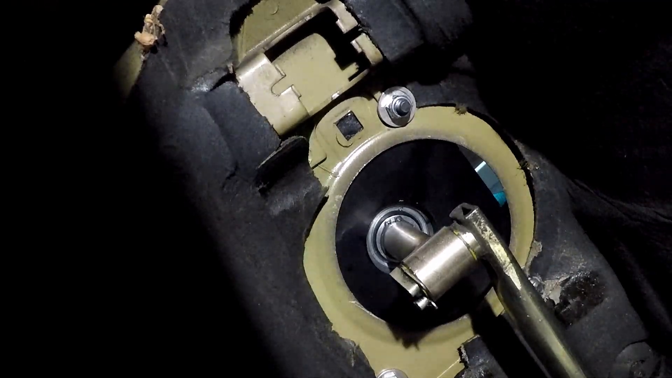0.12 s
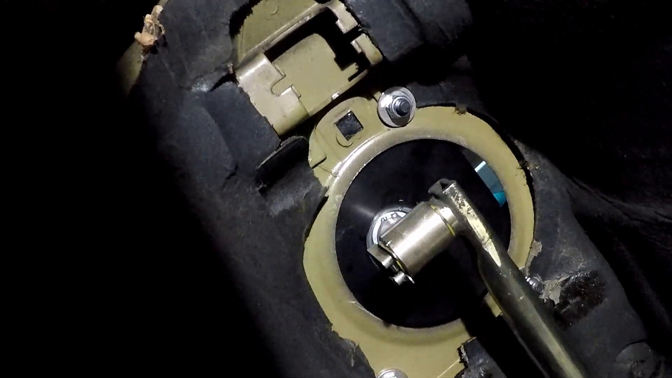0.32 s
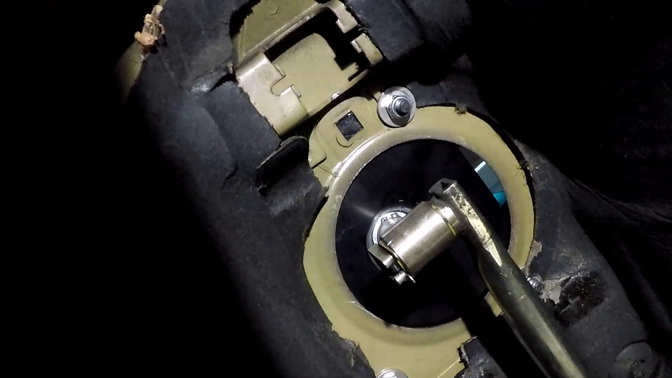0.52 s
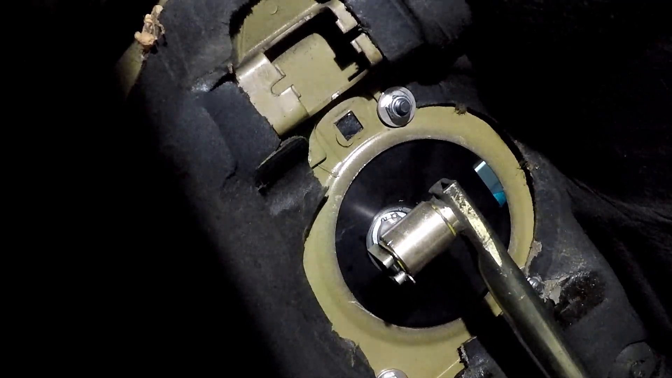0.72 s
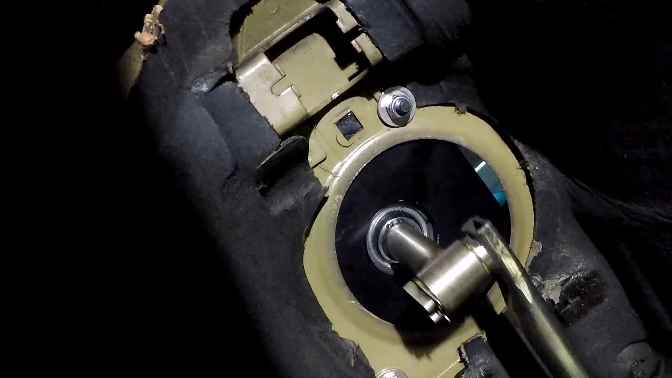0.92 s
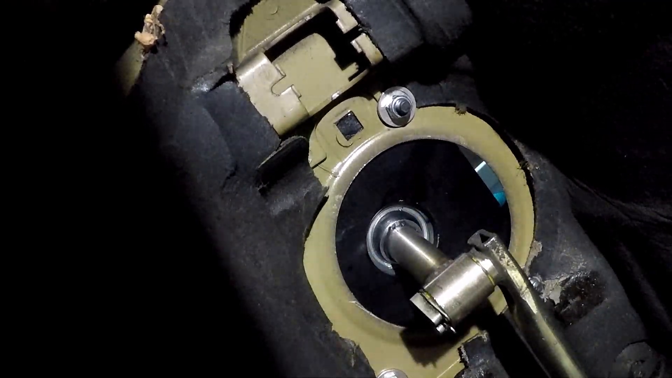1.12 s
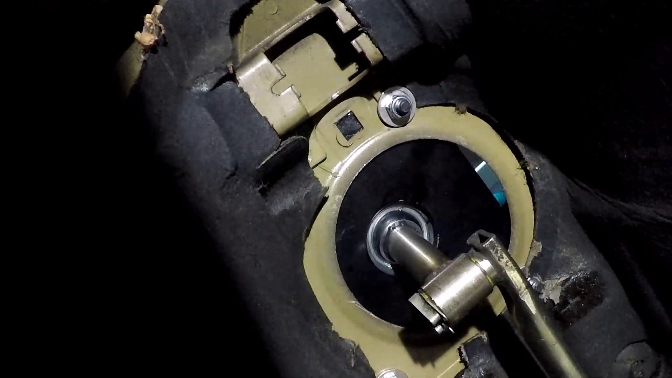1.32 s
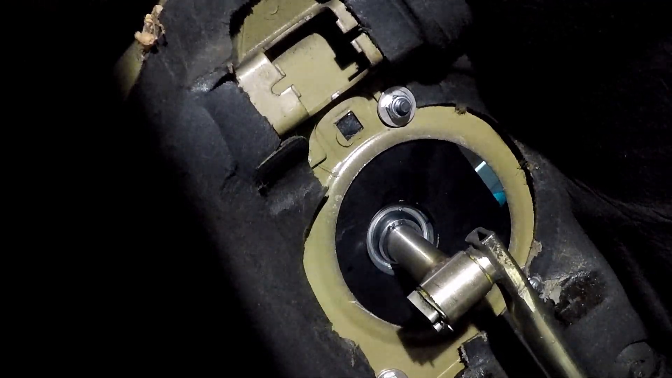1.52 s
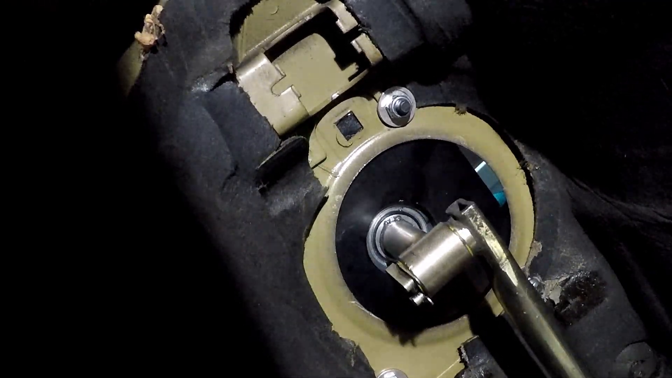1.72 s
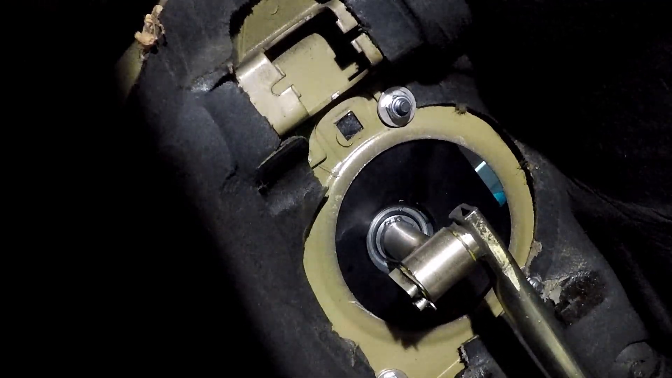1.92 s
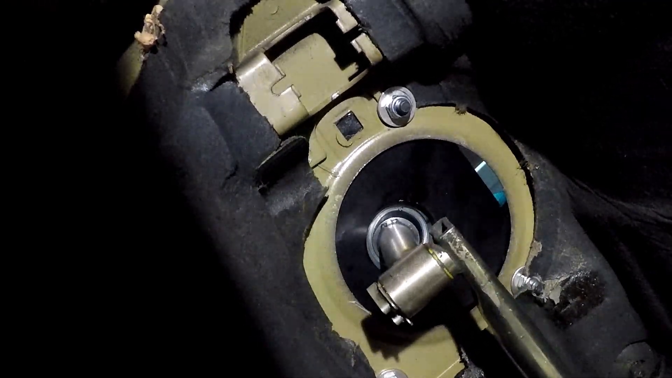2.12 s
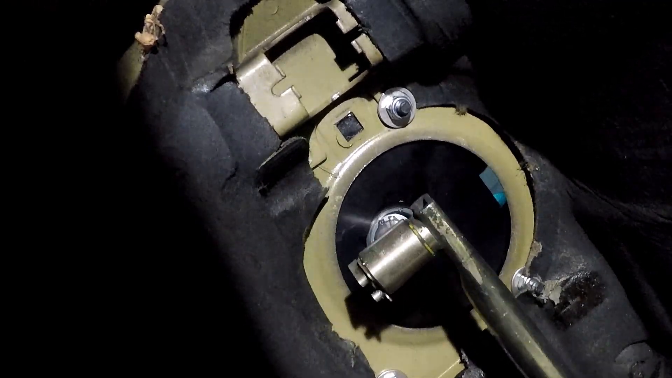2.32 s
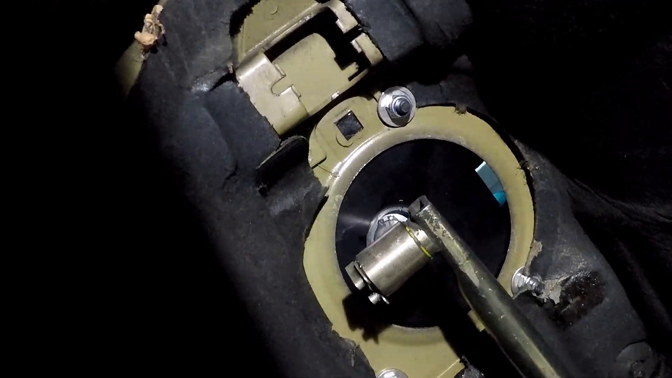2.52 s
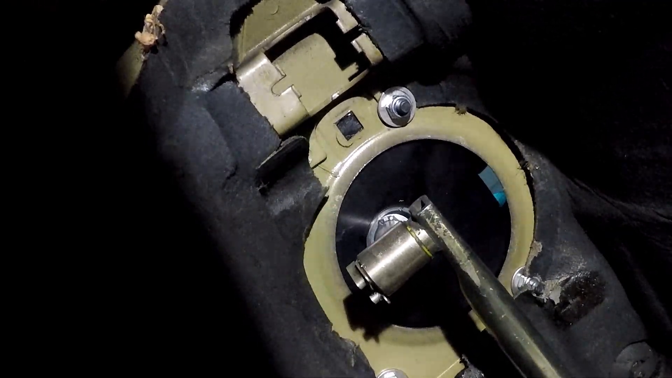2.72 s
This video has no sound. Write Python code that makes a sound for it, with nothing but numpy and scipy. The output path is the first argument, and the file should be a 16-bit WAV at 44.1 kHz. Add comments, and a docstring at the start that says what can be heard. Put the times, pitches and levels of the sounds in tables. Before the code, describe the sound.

Gear linkage clunks heard from beneath a car: a rattling burst of metal knocks, a pause, another cluster, then lighter clicks and a final hard clack, with floor pan boom, close microphone in a quiet garage.

```python
"""Gear lever heard from below

A gear lever is worked through its gate; a small microphone listens under the car in a garage.
Each linkage contact is a chatter of tiny impacts, convolved with the modes of housing and rod; mounts thud.
Shoves excite slowly decaying floor pan modes. Coloured noise makes the sliding rod, sizzling thin metal
and low room hum. The garage returns a diffuse echo of the contacts, and a limiter holds the peaks."""
import sys
import numpy as np
from scipy import signal
from scipy.fft import rfft, irfft
from scipy.io import wavfile
from scipy.ndimage import uniform_filter1d, minimum_filter1d

SR = 44100
rng = np.random.default_rng(int(sys.argv[2]) if len(sys.argv) > 2 else 0)


def store_pcm(level_fs):
    """Save levels as 16-bit WAV."""
    pcm = np.round(np.clip(level_fs, -1, 1) * 32767).astype(np.int16)
    wavfile.write(sys.argv[1], SR, np.atleast_2d(pcm).T)


def convert_level_to_amplitude(level_db):
    """Map a level in decibels to its linear amplitude factor."""
    exponent = np.asarray(level_db, float) / 20
    return 10 ** exponent


N = 125685  # samples


def unit(x):
    """Normalisation by mean power: scales to rms 1."""
    return x / np.sqrt(np.mean(x ** 2))


def noise(points, size):
    """Spectral shaping: white noise filtered to (Hz, dB) points on a log frequency axis, rms 1."""
    hz, db = np.array(points, float).T
    f = np.maximum(np.arange(size // 2 + 1) * SR / size, 1)
    gain_db = np.interp(np.log(f), np.log(hz), db, left=-90, right=-90)
    return unit(irfft(rfft(rng.standard_normal(size)) * convert_level_to_amplitude(gain_db), size))


def fade(t, t60):
    """Exponential damping: the amplitude falls by 60 dB in t60 seconds."""
    return np.exp(-np.log(1000) * t / t60)


def swell(t, time_constant):
    """Exponential approach: the amplitude rises from 0 towards 1."""
    return 1 - np.exp(-t / time_constant)


def ring(modes, t, detune, count=1):
    """Modal superposition: each mode is a cluster of damped partials; nominal rms 1 at the start."""
    hz, db, t60 = np.repeat(np.array(modes, float), count, axis=0).T[:, :, None]
    strength, shift, turn = rng.standard_normal((len(hz), 3)).T[:, :, None]
    gain = convert_level_to_amplitude(db + 3 * strength)  # scatter of 3 dB
    phase = 2 * np.pi * hz * (1 + detune * shift) * t
    # the subtracted term starts every partial from zero
    wave = np.sin(phase + 2 * turn) - np.sin(2 * turn) * np.exp(-phase)
    total = (gain * fade(t, t60) * wave).sum(0)
    return total / np.sqrt((gain ** 2).sum() / 2)


def flicker(rate, depth_db):
    """Random amplitude modulation: a gain with rate new values a second and an rms depth in dB."""
    k = int(SR / rate)
    steps = np.repeat(rng.standard_normal(N // k + 1), k)
    return convert_level_to_amplitude(depth_db * unit(uniform_filter1d(steps, k)[:N]))


def curve(table, col):
    """Amplitude envelope: straight lines between the dB values of one column."""
    table = np.array(table)
    return convert_level_to_amplitude(np.interp(np.arange(N) / SR, table[:, 0], table[:, col]))


# Steady room noise. Each row: frequency in Hz, relative density in dB per Hz.
ROOM_COLOUR = [(16, -43), (28, -1), (37, 7), (72, 12), (92, -2.5), (133, 4.5), (156, -9), (187, 6.5),
               (231, -28), (301, -22.5), (353, -29.5), (392, -21), (539, -30.5), (739, -52), (1320, -28.5),
               (1590, -35), (3160, -51), (7550, -46.5), (15400, -62.5)]
# Wavering hum. Each row: centre in Hz, level in dB, offset in Hz at which the band is about 15 dB down.
HUM_BANDS = [(68.8, -78, 3.3), (136.2, -57, 24), (176.8, -61, 3.1), (373.4, -75, 30)]


def room():
    """Stationary background: broadband noise with a slow wander, plus narrowband noise heard as hum."""
    hum = 0
    for hz, db, w in HUM_BANDS:
        hum = hum + convert_level_to_amplitude(db) * noise([(hz - 2 * w, -30), (hz, 0), (hz + 2 * w, -30)], N)
    wander = flicker(4, 1.2)
    return convert_level_to_amplitude(-47) * noise(ROOM_COLOUR, N) * wander + hum


# Rod sliding in its bushes. Each row: time in seconds, scrape level in dB, hiss level in dB.
SLIDE_LEVELS = [(0, -58, -74.5), (.19, -63.5, -77), (.3, -60, -62), (.5, -64, -85), (.75, -67.5, -82),
                (.8, -69.5, -76), (.87, -46.5, -69), (.93, -40, -66), (1.0, -61, -64), (1.1, -67.5, -81),
                (1.3, -66, -80), (1.4, -55.5, -74), (1.55, -58, -78.5), (1.64, -52.5, -68),
                (1.72, -56, -66), (1.9, -60, -77), (2.03, -53, -72), (2.13, -42, -67), (2.21, -63.5, -62.5),
                (2.27, -54, -69.5), (2.4, -53, -73), (2.52, -71, -85.5), (2.75, -68.5, -83),
                (2.85, -61.5, -83)]
# Colour of the scrape. Each row: frequency in Hz, relative density in dB per Hz.
SCRAPE_COLOUR = [(250, -2), (500, 5.5), (1000, -6), (2000, -12), (2800, -16), (4000, -70)]
# Colour of the hiss. Each row: frequency in Hz, relative density in dB per Hz.
HISS_COLOUR = [(2000, -15), (3200, 9), (4500, 7.5), (7000, 2.5), (10000, -1.5), (13500, -16), (15500, -28)]


def sliding():
    """Friction noise: the moving rod gives a grainy scrape and a smoother hiss."""
    scrape = curve(SLIDE_LEVELS, 1) * flicker(60, 2.3) * noise(SCRAPE_COLOUR, N)
    hiss = curve(SLIDE_LEVELS, 2) * flicker(80, 1.4) * noise(HISS_COLOUR, N)
    return scrape + hiss


# Sizzle of thin metal. Each row: time in seconds, centre of the loudest region in Hz, level in dB.
SIZZLE = [(0, 8000, -78), (.2, 8000, -79), (.33, 10000, -84), (.45, 9600, -75), (.6, 8600, -80),
          (.76, 8000, -81.5), (1.0, 10200, -77), (1.15, 9500, -77.5), (1.3, 8200, -84), (1.45, 7800, -83.5),
          (1.7, 9800, -76), (1.85, 8800, -76), (2.02, 7700, -78), (2.2, 9000, -75), (2.38, 10000, -84),
          (2.5, 9500, -79.5), (2.65, 8400, -82.5), (2.85, 8000, -87)]


def shimmer():
    """Narrowband noise: thin metal sizzles in bands that flicker alone, loudest near a drifting centre."""
    table = np.array(SIZZLE)
    centre = np.interp(np.arange(N) / SR, table[:, 0], table[:, 1])
    spread, w = 1200, 170  # Hz
    bands = 0
    for hz in np.linspace(6900, 11400, num=14):
        nearness = np.exp(-((hz - centre) / spread) ** 2 / 2)
        band = noise([(hz - 2 * w, -25), (hz, 0), (hz + 2 * w, -25)], N)
        bands = bands + nearness * flicker(18, 2.5) * band
    return curve(SIZZLE, 2) * unit(bands)


# Contacts in the linkage. Each row: time in seconds, housing level below the split in dB,
# housing level above it in dB, mount thud level in dB, rod level in dB, crack level in dB,
# decay time constant of the chatter in seconds.
LINKAGE_CONTACTS = [(0.209, -55.5, -44, -26.5, -73, -81, 0.0044),
                    (0.216, -31.5, -37, -17.5, -58, -70, 0.0053),
                    (0.234, -21, -29.5, -17.5, -49.5, -71, 0.0045),
                    (0.252, -20.5, -25.5, -32, -43, -62, 0.0041),
                    (0.266, -21.5, -30.5, -21.5, -43, -66, 0.0048),
                    (0.28, -22.5, -24.5, -48, -35, -54.5, 0.0033),
                    (0.294, -22.5, -42, -28, -48, -69, 0.0049),
                    (0.777, -40.5, -57, -28, -71.5, -82, 0.0032),
                    (0.797, -34, -45, -25, -50.5, -61, 0.0035), (0.832, -45.5, -72, -31, -84, -103, 0.0037),
                    (0.891, -25, -29, -36, -42, -52.5, 0.0033),
                    (0.903, -21.5, -29.5, -16.5, -43, -55, 0.0021),
                    (0.925, -21, -51, -36, -72, -81, 0.0028), (0.949, -19, -30.5, -37, -51, -84, 0.0056),
                    (0.965, -27, -35, -48, -54, -76, 0.0063),
                    (0.978, -22.5, -35.5, -28, -42.5, -57.5, 0.0039),
                    (0.992, -32, -39, -39, -58, -74, 0.0038), (1.461, -26, -43, -19.5, -69, -77, 0.0051),
                    (1.5, -39.5, -51, -31, -60.5, -88, 0.0064), (1.598, -54, -63, -32.5, -89, -93, 0.005),
                    (1.633, -40, -46, -38, -63, -68, 0.015),
                    (1.669, -20.5, -25.5, -14.5, -38.5, -49, 0.0051),
                    (1.685, -31.5, -36.5, -17.5, -51.5, -65, 0.0068),
                    (1.765, -41.5, -50.5, -31.5, -68, -75, 0.004),
                    (1.845, -46.5, -56, -37, -68.5, -86, 0.0024), (1.974, -43.5, -62, -46, -78, -84, 0.007),
                    (1.993, -40, -60, -49, -70, -79, 0.0048), (2.017, -39, -64, -43, -81, -80, 0.0059),
                    (2.046, -30, -43.5, -30, -62, -64, 0.0056),
                    (2.074, -33, -42.5, -31.5, -59, -68, 0.0089),
                    (2.106, -21, -27.5, -18.5, -61, -75, 0.0055),
                    (2.153, -42, -58, -56.5, -74, -72, 0.0035),
                    (2.279, -37.5, -36.5, -30.5, -50.5, -63, 0.0047),
                    (2.297, -26, -37, -29, -51.5, -70, 0.0036),
                    (2.31, -23.5, -24, -38.5, -38, -58.5, 0.0061),
                    (2.326, -34.5, -27.5, -43, -37, -61.5, 0.0033),
                    (2.336, -22.5, -40, -50, -53.5, -69, 0.0033)]
# Gearbox housing modes. Each row: frequency in Hz, relative level in dB, t60 in seconds.
HOUSING_MODES = [(351.7, -3, 0.13), (401, -9, 0.072), (505.4, -3.5, 0.082), (605, -3.5, 0.15),
                 (683.3, 1.5, 0.11), (804, 1.5, 0.048), (989, -5, 0.071), (1136.5, 1, 0.076),
                 (1376, -6.5, 0.051), (1713, -25, 0.033), (1854, -21, 0.17), (2306, -31, 0.033)]
# Steel rod modes. Each row: frequency in Hz, relative level in dB, t60 in seconds.
ROD_MODES = [(3625, -8.5, 0.026), (4350, 4, 0.084), (4900, -12, 0.37), (5074, 10.5, 0.033),
             (5400, -24, .15), (6680, 5, 0.036), (6730, -11.5, 0.083), (7300, -8, 0.19)]
# Mount modes. Each row: frequency in Hz, relative level in dB, t60 in seconds.
MOUNT_MODES = [(172, -7.5, 0.083), (201.5, 1.5, 0.15), (225.5, -6.5, 0.13), (299, -11, 0.084),
               (347, -25, 0.61), (391.4, -29, 0.81)]
# Dense small modes of the housing. Each row: frequency in Hz, relative density in dB per Hz.
DULL_COLOUR = [(200, 7), (350, -8), (700, -6), (1400, -3.5), (2200, -11.5), (3200, -20), (6000, -54)]
# Dense small modes of the rod. Each row: frequency in Hz, relative density in dB per Hz.
BRIGHT_COLOUR = [(1800, -31.5), (3000, 1.5), (5000, 9.5), (7000, -6.5), (9000, -24), (11000, -34.5)]
# Sharp crack. Each row: frequency in Hz, relative density in dB per Hz.
CRACK_COLOUR = [(6500, 4), (8500, 3.5), (11000, -5), (13000, -11), (15400, -18)]
SPLIT_HZ, SOFT_HZ = 725, 2670  # where the housing is split, and where its upper part rolls off
DETUNE, ROD_DETUNE = 0.0156, 0.035  # random shift of the partials, as a fraction of frequency


def peak(x):
    """Short-time power: scales the loudest 10 ms to rms 1."""
    return x / np.sqrt(uniform_filter1d(x ** 2, 441).max())


def tail(colour, t60, t):
    """High modal density: many small modes merge into decaying noise."""
    return noise(colour, len(t)) * fade(t, t60) * swell(t, 0.00023)


def chatter(t, decay_s):
    """Repeated impact: a burst of random tiny blows swells and dies away."""
    grit_db = 1.5 * rng.exponential(size=len(t))
    hits = rng.standard_normal(len(t)) * convert_level_to_amplitude(grit_db)
    return hits * np.exp(-t / decay_s) * swell(t, 0.0025) ** 2


def linkage():
    """Source-filter convolution: chatter strikes housing and rod, while the mounts thud below."""
    size = 32768
    t = np.arange(size) / SR
    short, burst = t[:size // 4], t[:size // 16]
    ticks, lows = np.zeros(N + size), np.zeros(N + size)
    low = signal.butter(2, SPLIT_HZ, fs=SR, output="sos")
    steep_low = np.vstack([low, low])
    high = signal.butter(2, SPLIT_HZ, "high", fs=SR, output="sos")
    soft = signal.butter(4, SOFT_HZ, fs=SR, output="sos")
    upper = np.vstack([high, soft])
    for s, housing_db, upper_db, thud_db, rod_db, crack_db, chatter_s in LINKAGE_CONTACTS:
        hits = chatter(burst, chatter_s)

        def struck(body):
            """Linear superposition: every tiny blow sets off the response of the body."""
            return signal.fftconvolve(hits, body)[:len(short)]

        housing_body = ring(HOUSING_MODES, short, DETUNE, count=2) + convert_level_to_amplitude(4) * tail(DULL_COLOUR, 0.041, short)
        rod_body = ring(ROD_MODES, short, ROD_DETUNE, count=8) + convert_level_to_amplitude(3.5) * tail(BRIGHT_COLOUR, 0.046, short)
        housing = struck(housing_body)
        contact = convert_level_to_amplitude(housing_db) * peak(signal.sosfilt(steep_low, housing))
        contact += convert_level_to_amplitude(upper_db) * peak(signal.sosfilt(upper, housing))
        contact += convert_level_to_amplitude(rod_db) * peak(struck(rod_body))
        contact += convert_level_to_amplitude(crack_db) * peak(struck(tail(CRACK_COLOUR, 0.056, short)))
        k = int((s - 0.003) * SR)  # the burst begins 3 ms before the listed time
        ticks[k:k + len(short)] += contact
        thud = ring(MOUNT_MODES, t, DETUNE) * swell(t, 0.0067)
        lows[k:k + size] += convert_level_to_amplitude(thud_db) * thud
    return ticks[:N], lows[:N]


def garage(x):
    """Diffuse reverberation: floor and walls around the car return a decaying noise echo, dulled on top."""
    t = np.arange(SR // 2) / SR
    echo = rng.standard_normal(len(t)) * fade(t, 0.37) * swell(t, 0.002)
    echo = signal.sosfilt(signal.butter(1, 4070, fs=SR, output="sos"), echo)
    echo = echo / np.sqrt((echo ** 2).sum())  # unit energy
    return convert_level_to_amplitude(-22) * signal.fftconvolve(x, echo)[:N]


# Shoves that shake the floor pan. Each row: start in seconds, deep level in dB, drum level in dB.
PAN_SHOVES = [(.215, -29.5, -30), (.255, -31, -25.5), (.29, -28.5, -27), (0.786, -33, -37.5),
              (0.889, -27, -31.5), (0.951, -30, -34.5), (1.46, -35, -34), (1.509, -39.5, -38),
              (1.619, -38.5, -41.5), (1.67, -30, -30), (1.769, -36, -35.5), (1.988, -39, -37),
              (2.05, -29.5, -31.5), (2.099, -37.5, -30.5), (2.281, -28.5, -27), (2.315, -29, -24)]
# Deep modes of the floor pan. Each row: frequency in Hz, relative level in dB, t60 in seconds.
DEEP_MODES = [(43, -13, 0.7), (52.8, -8.5, 1.15), (64.3, -5.5, 1.33), (71.47, -3, 1.01), (90.2, -1.5, 0.95)]
# Drum modes of the floor pan. Each row: frequency in Hz, relative level in dB, t60 in seconds.
DRUM_MODES = [(108.75, -5, 1.3), (118.3, 0, 0.93), (127.76, 1, 1.14), (136.9, -4.5, 1.64),
              (151.2, -2, 1.38), (180.3, -11.5, 0.96), (218, -17, 1.13), (272, -21, 0.52)]


def floor_pan():
    """Plate resonance with beating: shoves swell into a long boom, wavering between close partials."""
    detune = 0.0418  # as a fraction of frequency
    t = np.arange(SR // 8) * 8 / SR  # low modes need only an eighth of the sample rate
    out = np.zeros(N // 8 + 1 + len(t))
    for s, deep_db, drum_db in PAN_SHOVES:
        k = int(s * SR / 8)
        deep = convert_level_to_amplitude(deep_db) * ring(DEEP_MODES, t, detune, count=3)
        drum = convert_level_to_amplitude(drum_db) * ring(DRUM_MODES, t, detune, count=3)
        out[k:k + len(t)] += (deep + drum) * swell(t, 0.013)
    return signal.resample_poly(out, up=8, down=1)[:N]


def scene():
    """Superposition of pressures: all sources add at one microphone, fed to two equal channels."""
    ticks, lows = linkage()
    mono = room() + sliding() + shimmer() + ticks + lows + garage(ticks) + floor_pan()
    return np.array([mono, mono])


def roll_off(x):
    """The treble ends steeply here."""
    return signal.sosfilt(signal.butter(12, 15540, fs=SR, output="sos"), x)


def record(dry):
    """Peak limiting with look-ahead; then a wavering difference parts the channels at the very top."""
    ceiling = 0.225  # of full scale
    gain = ceiling / np.maximum(np.abs(dry[0]), ceiling)
    held = minimum_filter1d(gain, 187)  # lowest gain within 4 ms
    mono = dry[0] * uniform_filter1d(held, 94)  # smoothed over 2 ms
    top = signal.sosfilt(signal.butter(10, 11800, "high", fs=SR, output="sos"), mono)
    waver = noise([(20, 5), (300, 6.5), (400, -26.5)], N)
    side = convert_level_to_amplitude(-4) * top * waver
    return roll_off(mono + side * np.array([[1], [-1]]))


dry = scene()
out = record(dry)
store_pcm(out)
```